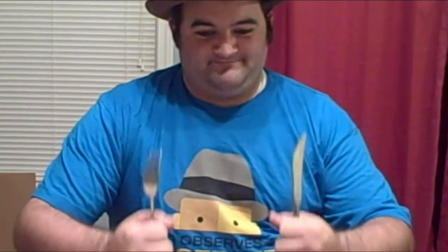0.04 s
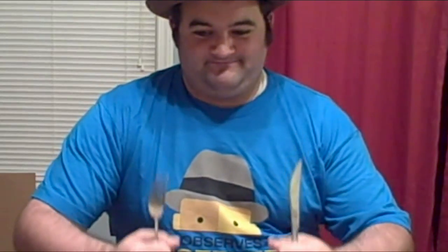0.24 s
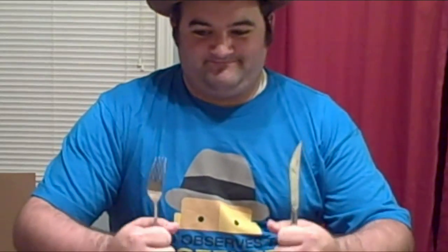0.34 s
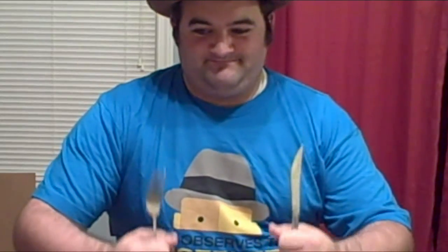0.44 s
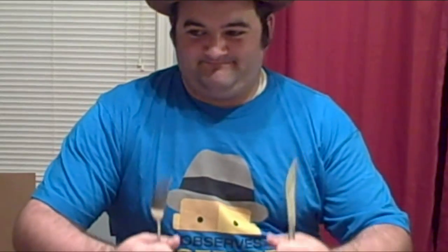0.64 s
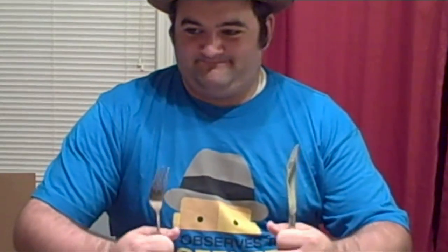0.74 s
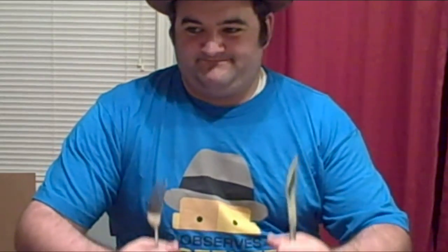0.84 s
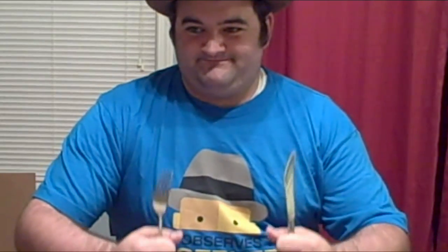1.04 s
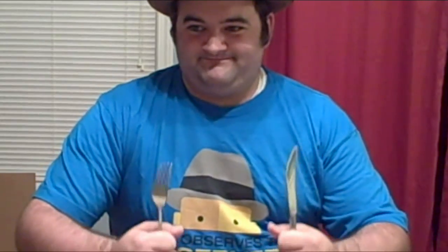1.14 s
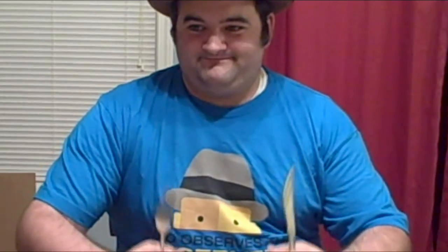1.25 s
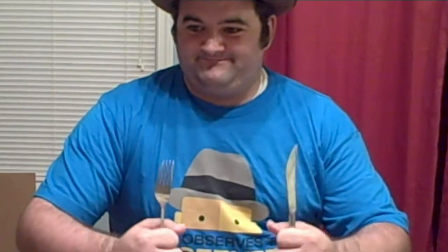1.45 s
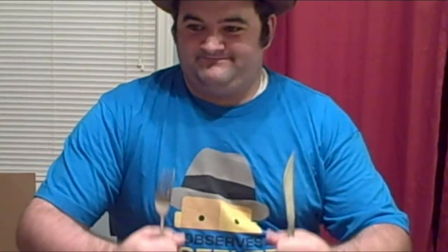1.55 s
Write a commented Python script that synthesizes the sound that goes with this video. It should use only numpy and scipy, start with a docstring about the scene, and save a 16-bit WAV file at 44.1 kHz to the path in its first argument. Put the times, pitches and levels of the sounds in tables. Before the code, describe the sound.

Fists gripping cutlery bang once on a table, a sharp wooden knock with a short metallic clack that briefly overloads the microphone. The small room rings for a moment, then goes quiet apart from faint hum and hiss.

```python
"""Fists and cutlery hit a table

Two fists holding a fork and a knife come down on a table: one hard, woody knock.
Table and cutlery ring, and the knock briefly overloads the microphone.
The small room rings for half a second. Underneath lie a few faint rustles of the
hands, a mains hum, a thin high whine and hiss."""
import sys
import numpy as np
from scipy import signal
from scipy.fft import rfft, irfft
from scipy.io import wavfile

SR = 44100
rng = np.random.default_rng(int(sys.argv[2]) if len(sys.argv) > 2 else 0)


def generate_wav(sig):
    """Save sig (samples, or channels by samples) to the path in sys.argv[1] as 16-bit PCM at SR."""
    pcm = np.round(np.clip(np.atleast_2d(sig).T, -1, 1) * 32767).astype(np.int16)
    wavfile.write(sys.argv[1], SR, pcm)


N = 70560
TIME = np.arange(N) / SR
BIN_HZ = np.arange(N // 2 + 1) * SR / N  # the pitches that make up a spectrum

# the quick hits heard as one knock: start_s, strength_db, length_ms
CONTACTS = [(0.2382, -14, 0.1), (0.2391, 1.5, 0.08), (0.2450, -15.5, 0.11)]
# tone colour of the room's ringing: pitch_hz, level_db
ROOM_COLOUR = [(60, -31), (160, -16), (250, -19), (400, -5.5), (590, -10), (780, 4), (1100, -1),
               (1750, -4.5), (2200, -17), (3000, -15.5), (4000, -24), (6500, -31), (10000, -37),
               (15000, -42.5)]


def knock():
    """Each hit is a short push that sets table and cutlery ringing, with a thud and a sharp crack."""
    # the notes the table rings with: pitch_hz, level_db, fade_s
    table_notes = [(175, -20.5, 0.2), (380.4, -29.5, 0.15), (719.4, -14, 0.08), (857, -6, 0.029),
                   (801.5, -20, 0.53), (847, -22.5, 0.28), (1009.5, -24.5, 0.4), (1192, -14, 0.029),
                   (1411, -8.5, 0.026), (1348, -33.5, 0.55), (1532, -31.5, 0.52), (1639, -22, 0.06),
                   (1686, -29.5, 0.34), (1822, -29.5, 0.22)]
    # the clack of the cutlery handles, damped by the fists: pitch_hz, level_db, fade_s
    cutlery_notes = [(2227, -26, 0.08), (2620, -14, 0.028), (2893, -20, 0.06), (4454, -13.5, 0.016),
                     (4860, -15.5, 0.015), (7130, -26, 0.014), (8140, -30.5, 0.014), (10435, -33.5, 0.01)]
    # tone colour of the crack: pitch_hz, level_db
    crack_colour = [(100, -17.5), (500, -13.5), (1200, 3.5), (2600, -3), (3700, -7.5), (5000, -9.5),
                    (7000, -16.5), (15000, -26)]
    table = filtered(ringing(table_notes), 466, "high")  # a table top gives off low notes poorly
    thud = ringing([(65, -32.5, 0.048)])  # the soft fists: a low swing that dies fast
    body = table + ringing(cutlery_notes) + thud
    from_peak_ms = (TIME[:64] - TIME[32]) * 1000
    out = np.zeros(N)
    for start_s, strength_db, length_ms in CONTACTS:
        push = np.exp(-(2 * from_peak_ms / length_ms) ** 2)  # a shorter push sounds brighter
        struck = np.convolve(body, push / push.sum(), "same")
        crack = from_db(-12.5) * noise(crack_colour) * dying(fade_s=0.018)
        out += from_db(strength_db) * delayed(struck + crack, start_s)
    return out


def room(direct):
    """The room sends back a few dull echoes, and a wash of sound follows the hardest hit."""
    # the first reflections: delay_s, level_db
    reflections = [(0.0095, -19), (0.028, -25.5), (0.0555, -28.5)]
    # how long the room rings, from low to high: pitch_hz, fade_s
    band_fades = [(100, 0.44), (400, 0.48), (900, 0.56), (1600, 0.63), (2800, 0.52), (7000, 0.48),
                  (14000, 0.41)]
    pitches, fades = np.transpose(band_fades)
    wash = rfft(noise(ROOM_COLOUR))
    tail = np.zeros(N)
    for one_band, fade_s in zip(np.eye(len(pitches)), fades):
        weight = at_hz(list(zip(pitches, one_band)), BIN_HZ)
        tail += irfft(wash * weight, N) * dying(fade_s)
    build_up = 1 - np.exp(-TIME / 0.004)
    hardest_hit_s = max(CONTACTS, key=lambda row: row[1])[0]
    tail = delayed(tail * build_up, hardest_hit_s + 0.003)
    echoes = sum(from_db(db) * delayed(direct, delay_s) for delay_s, db in reflections)
    return from_db(-20) * tail + filtered(echoes, 5000, "low")


def rustles():
    """Moving hands make soft swells of rubbing noise, partly the ring of a cutlery handle."""
    # the hand movements: peak_s, level_db, half_length_s, ring_share (0 to 1)
    movements = [(0.22, -62, 0.015, 0.7), (0.952, -71.5, 0.036, 0.15), (1.324, -71, 0.023, 0.4)]
    # tone colour of the rubbing: pitch_hz, level_db
    rub_colour = [(500, -11.5), (1700, -3.5), (2500, -1), (5000, -5), (12000, -18)]
    # tone colour of a rubbed handle: pitch_hz, level_db
    handle_colour = [(1700, -30.5), (2200, -10), (2400, -0.5), (2650, -12.5), (3400, -31)]
    rub, ring = noise(rub_colour), noise(handle_colour)
    out = np.zeros(N)
    for peak_s, level_db, half_length_s, ring_share in movements:
        swell = np.exp(-((TIME - peak_s) / half_length_s) ** 2)
        blend = np.sqrt(1 - ring_share) * rub + np.sqrt(ring_share) * ring
        out += from_db(level_db) * swell * blend
    return out


def opening_ring():
    """The room is still faintly ringing at the start."""
    return from_db(-66.5) * noise(ROOM_COLOUR) * dying(fade_s=0.55)


def mains_hum():
    """Mains power hums on one low note."""
    # how loud the hum is: time_s, level_db
    loudness = [(0, -61.5), (0.15, -58.5), (0.65, -56), (1.0, -58), (1.22, -53.5), (1.4, -56.5), (1.6, -58)]
    return level(loudness) * tone(119.8, waver_db=1, waver_hz=6)


def whine():
    """An electrical whine: two very high notes close together."""
    # how loud the upper note is: time_s, level_db
    loudness = [(0, -98.5), (0.15, -71), (0.5, -75), (0.75, -67), (0.95, -63), (1.35, -60.5), (1.6, -61)]
    upper = level(loudness) * tone(15718, waver_db=1.5, waver_hz=30)
    lower = from_db(-77) * tone(15598, waver_db=1.5, waver_hz=30)
    return upper + lower


def room_air():
    """The room's air and hiss make a nearly steady bed of noise."""
    # tone colour of air and hiss: pitch_hz, level_db
    air_colour = [(20, -9.5), (60, -10), (100, -11.5), (170, -9.5), (260, -15), (500, -25.5), (780, -28.5),
                  (1240, -33), (5000, -38), (13000, -41.5), (15600, -38)]
    # how loud they are: time_s, level_db
    loudness = [(0, -61.5), (0.18, -62), (0.8, -61.5), (1.6, -60.5)]
    return level(loudness) * noise(air_colour)


def from_db(db):
    """Turn decibels into a number to multiply by."""
    return 10 ** (np.asarray(db) / 20)


def rms_one(x):
    """Scale a signal to an average strength (rms) of 1."""
    return x / np.sqrt(np.mean(x ** 2) + 1e-20)


def at_hz(points, hz):
    """Read between a table's rows, with octaves evenly spaced."""
    pitches, values = np.transpose(points)
    return np.interp(np.log(np.maximum(hz, 1)), np.log(pitches), values)


def level(rows):
    """Join (time_s, level_db) points into a volume curve."""
    return from_db(np.interp(TIME, *np.transpose(rows)))


def noise(colour):
    """Noise of a given tone colour, at strength 1."""
    white = rfft(rng.standard_normal(N))
    return rms_one(irfft(white * from_db(at_hz(colour, BIN_HZ)), N))


def tone(hz, waver_db, waver_hz):
    """A pure note whose loudness wavers at random, mostly slower than waver_hz."""
    sine = np.sqrt(2) * np.sin(2 * np.pi * (hz * TIME + rng.random()))
    white = rfft(rng.standard_normal(N))
    drift = rms_one(irfft(white / (1 + (BIN_HZ / waver_hz) ** 2), N))
    return sine * from_db(waver_db * drift)


def dying(fade_s):
    """A fade that falls 60 dB in fade_s seconds."""
    return np.exp(-np.log(1000) * TIME / fade_s)


def ringing(notes):
    """Pure notes that start together and fade."""
    return sum(from_db(db) * dying(fade_s) * np.sin(2 * np.pi * hz * TIME) for hz, db, fade_s in notes)


def delayed(x, delay_s):
    """The same sound, later."""
    return np.interp(TIME - delay_s, TIME, x, left=0)


def filtered(x, hz, keep):
    """Keep the "low" or "high" side of hz and soften the rest."""
    return signal.sosfilt(signal.butter(2, hz, keep, fs=SR, output="sos"), x + 1e-18)


def scene():
    """The knock in its room, over the background."""
    direct = knock()
    mix = direct + opening_ring() + room(direct) + rustles() + mains_hum() + whine() + room_air()
    return mix[None]


def record(dry):
    """The overloaded microphone flattens the biggest swings; the highest treble is cut."""
    ceiling, hardness, cutoff_hz = 0.51, 8, 15900
    flattened = dry / (1 + np.abs(dry / ceiling) ** hardness) ** (1 / hardness)
    treble_cut = signal.ellip(12, .1, 80, cutoff_hz, fs=SR, output="sos")
    return signal.sosfilt(treble_cut, flattened)


dry = scene()
out = record(dry)
generate_wav(out)
```